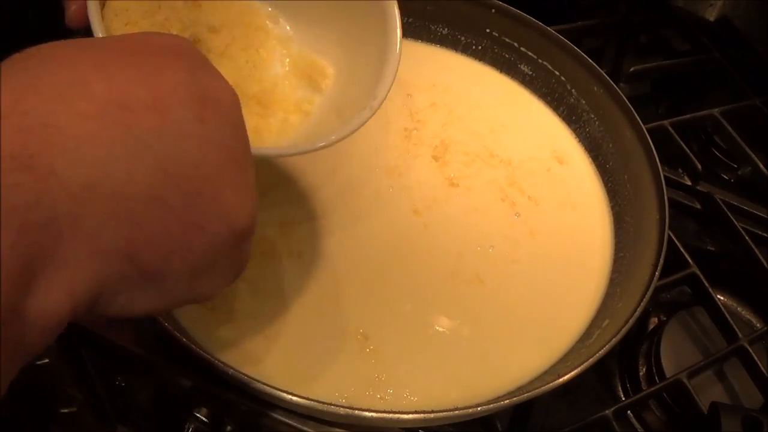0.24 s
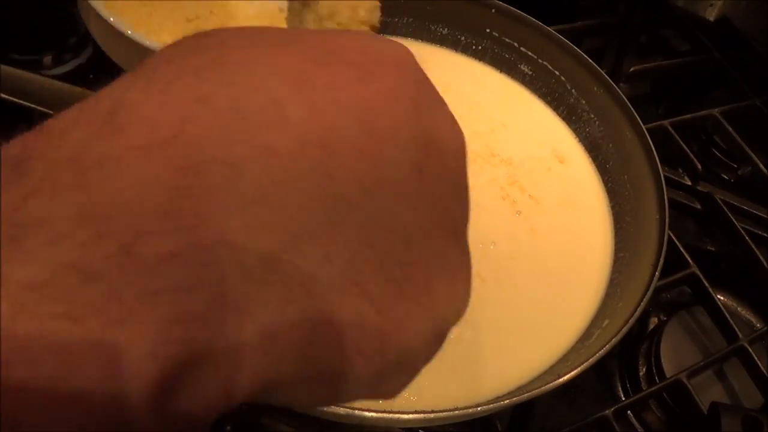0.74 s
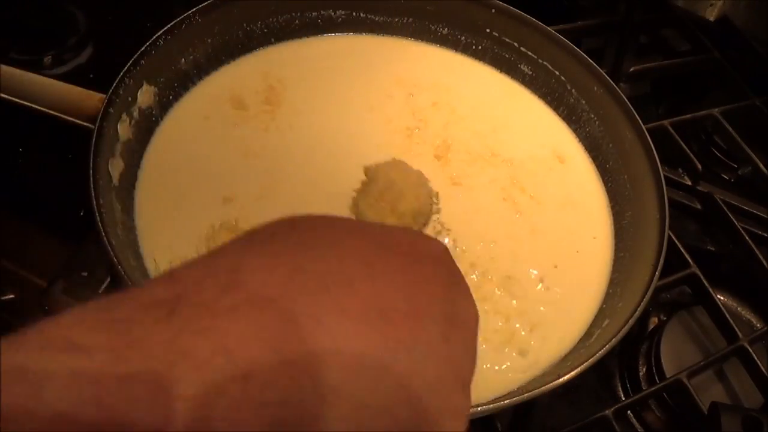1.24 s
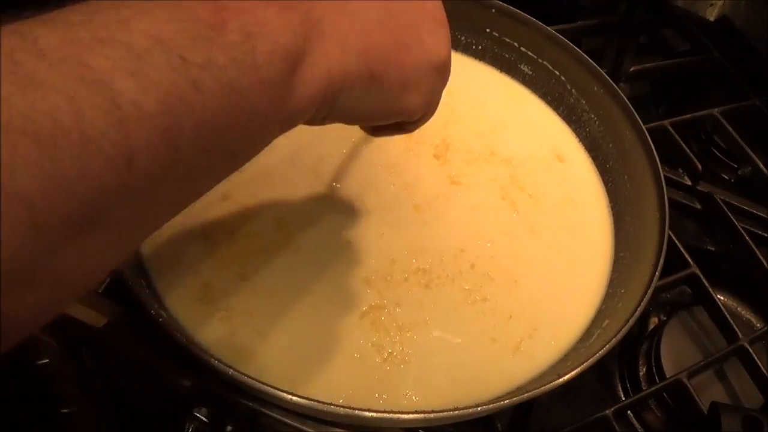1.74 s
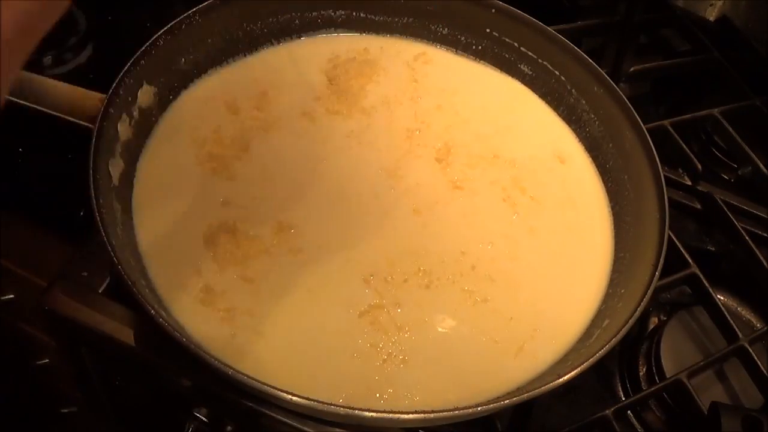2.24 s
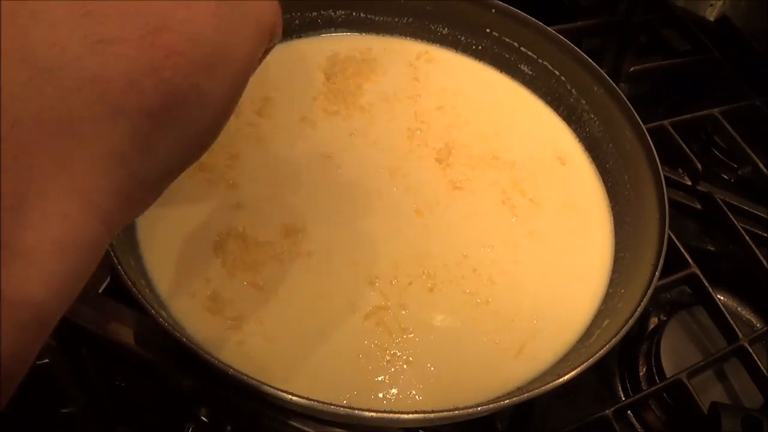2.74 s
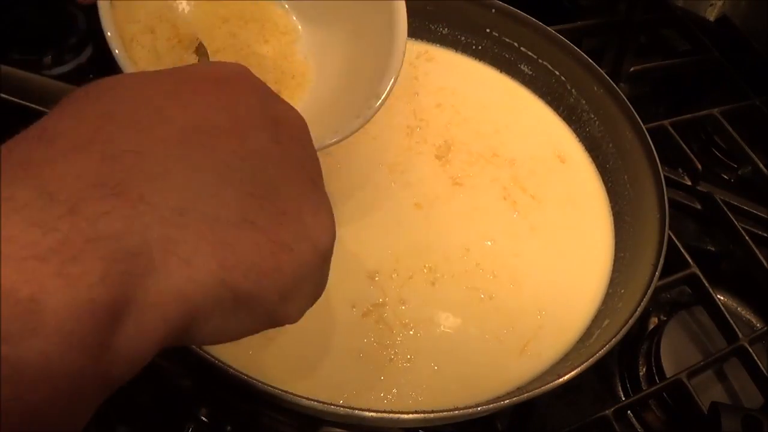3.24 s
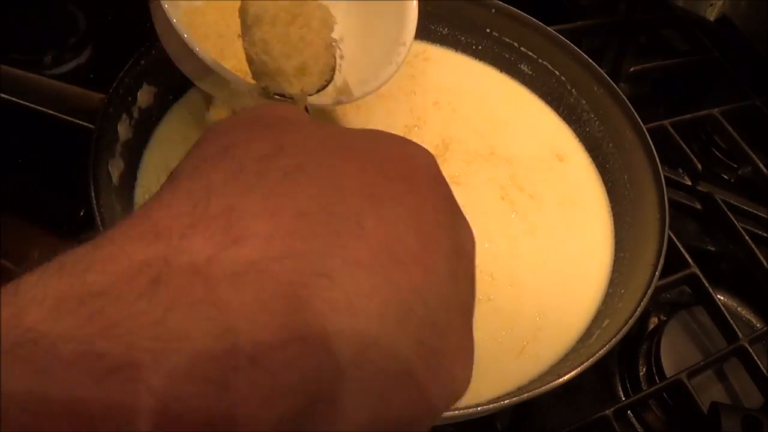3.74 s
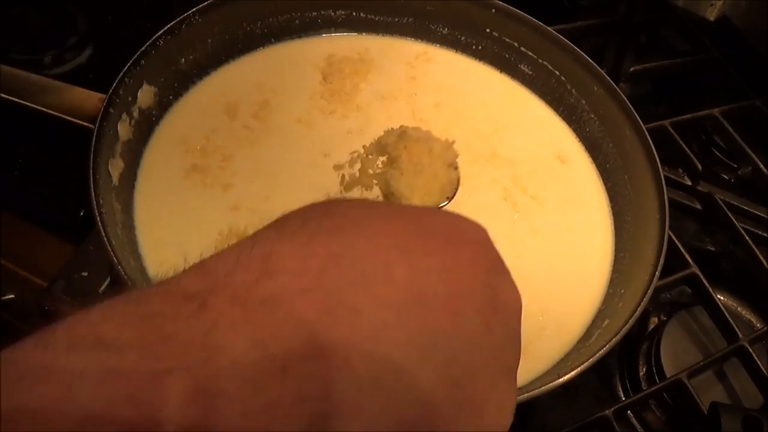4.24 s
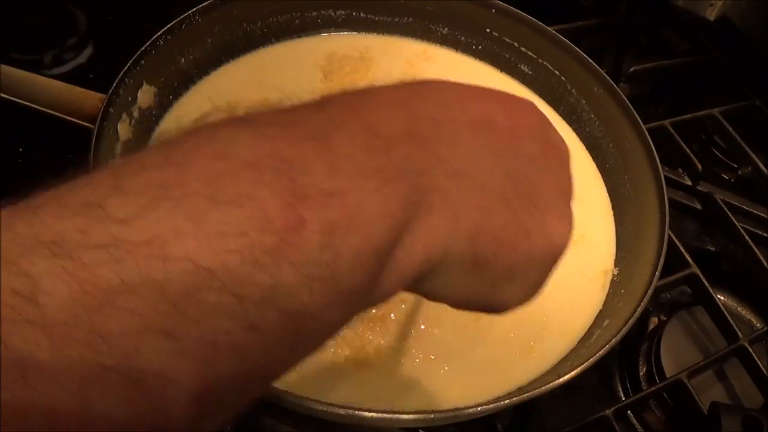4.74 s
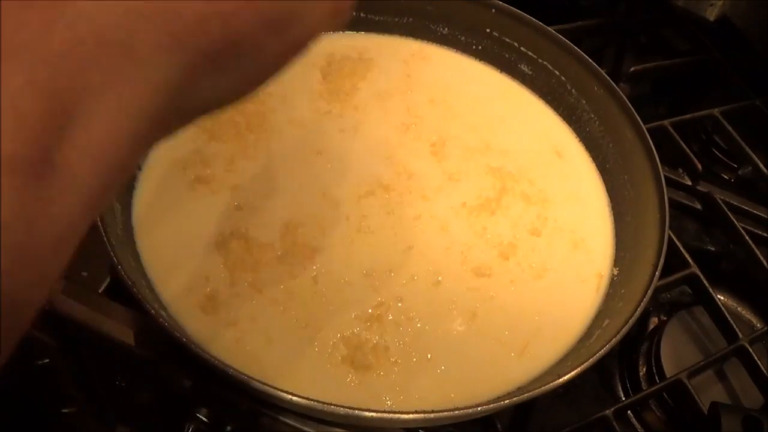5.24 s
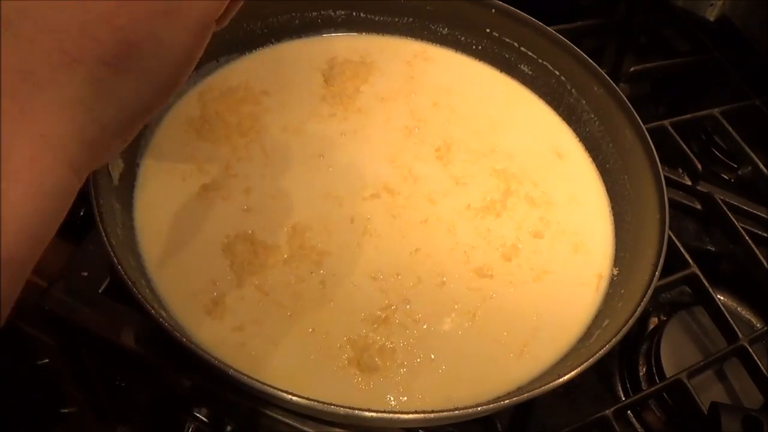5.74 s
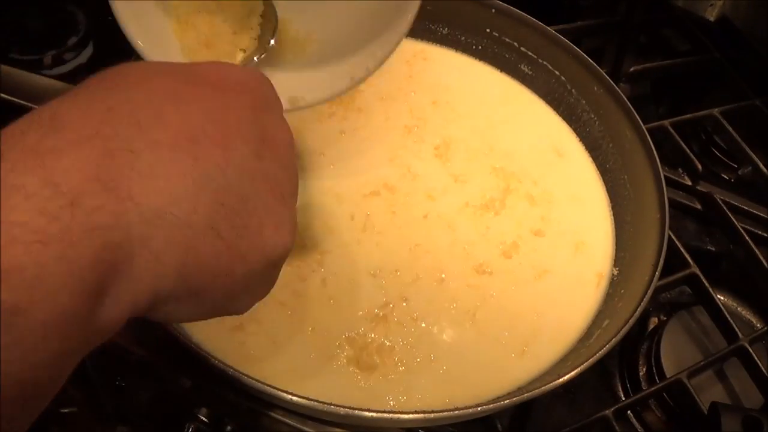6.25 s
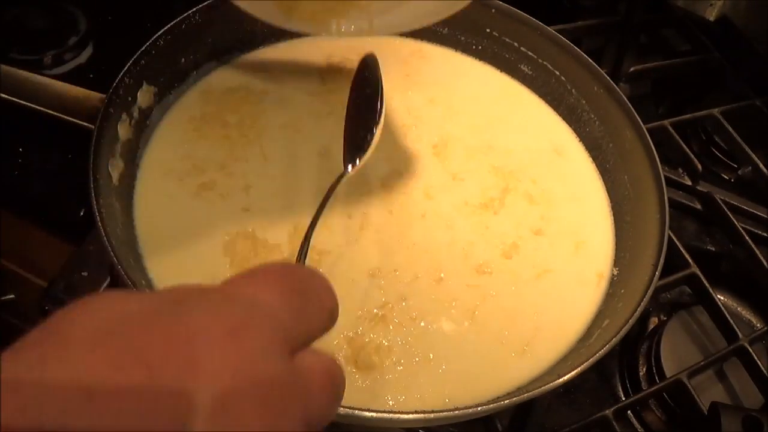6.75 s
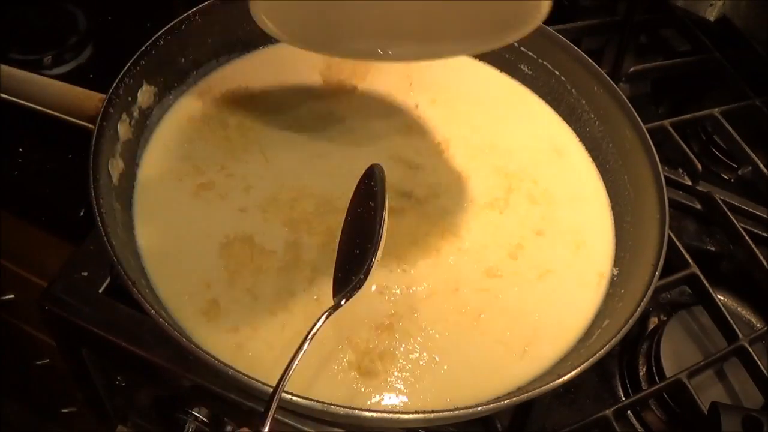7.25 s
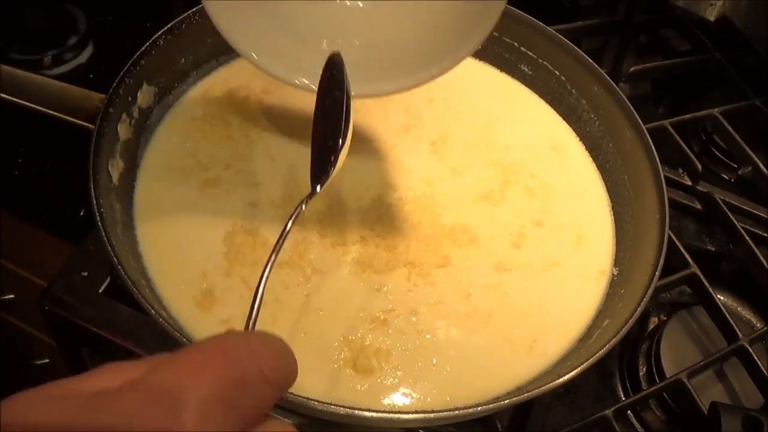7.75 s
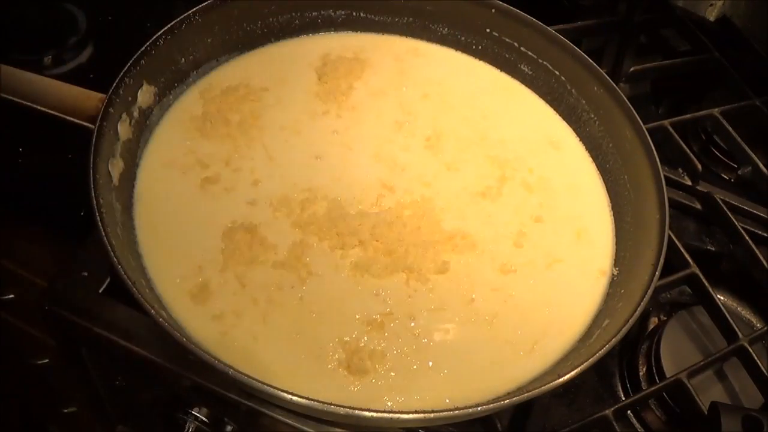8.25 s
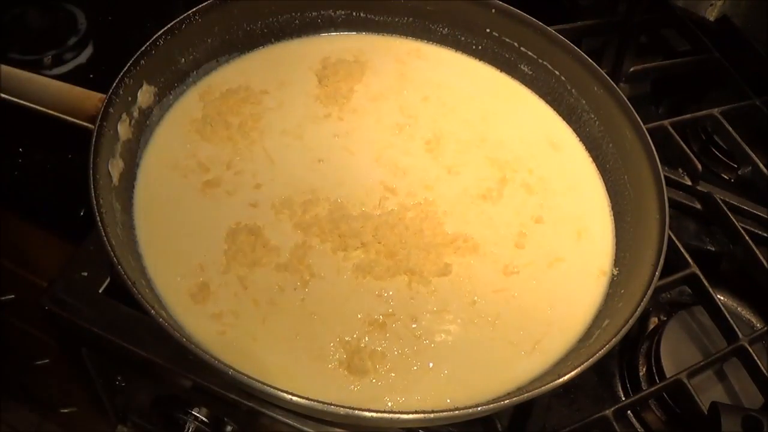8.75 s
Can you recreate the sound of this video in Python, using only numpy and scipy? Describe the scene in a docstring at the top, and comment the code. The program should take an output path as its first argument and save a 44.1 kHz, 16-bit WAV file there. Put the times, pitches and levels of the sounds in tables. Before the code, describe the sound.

A small kitchen, close microphone, with constant quiet hiss and faint fan hum. At once a steel spoon clinks and briefly scrapes in a hand-held ceramic bowl, with damped knocks until about 0.4 s and a very faint touch near 0.75. From 1.1 to 1.3 s grated cheese patters and rustles softly, then near quiet. At 2.5 s a sharp knock starts a second flurry, hardest at 2.9, with quick clinks and short scrapes fading by 3.8. Light grains and rustle follow around 3.9-4.5. At 5.5 s knocks return, brightest at 5.9, trailing into a scrape. From 6.1 to 7.6 come dull finger pats, soft rustle, tiny ticks and a barely audible rising squeak at 6.4. A loud, ringing ceramic clank bursts out at 8.2, another brighter spoon blow with a rasping scrape at 8.7, then small closing taps until 8.95.

```python
"""Small kitchen, close microphone: a steel spoon knocks and slides inside a hand-held ceramic bowl.
Under it all lies a quiet hum and hiss: noise shaped by a smooth spectrum with narrow bands. A first flurry of
knocks (cracks of noise and dying modes) ends by 0.8 s; from 1.1 s grated cheese patters into a pan as noise puffs.
Flurries return at 2.5 s and 5.5 s, with rustle and dull finger pats around them and a faint gliding squeak at 6.4 s.
From 8.2 s come loud last knocks; a look-ahead limiter flattens the hardest peaks."""
import sys
import numpy as np
from scipy import signal
from scipy.fft import rfft, irfft
from scipy.io import wavfile
from scipy.ndimage import uniform_filter1d, minimum_filter1d

SR = 44100
rng = np.random.default_rng(int(sys.argv[2]) if len(sys.argv) > 2 else 0)


def generate_wav(sig):
    """Save sig (samples, or channels by samples) to the path in sys.argv[1] as 16-bit PCM at SR."""
    pcm = np.round(np.clip(np.atleast_2d(sig).T, -1, 1) * 32767).astype(np.int16)
    wavfile.write(sys.argv[1], SR, pcm)


def field_ratio(decibels):
    """Amplitude ratio for a level in dB (20 dB per decade); scalars and array-likes work."""
    return 10 ** (np.asarray(decibels, dtype=float) / 20)


N = 396459  # samples, about 9 s

# modes of the ceramic bowl, which the hand splits in pairs: (frequency [Hz])
BOWL_MODE_HZ = [1290, 2130, 2268, 3210, 3320, 4110, 4185, 4355, 4530, 6850, 6945, 8343, 8625, 9570, 10450]
# how each bowl mode rings: (relative level [dB], t60 at full freedom [s], place of contact that rings it best [0-1])
BOWL_MODES = [(-25, 0.016, 0.2), (-2.5, 0.23, 0), (-5, 0.21, 1), (-15, 0.099, 0), (-23, 0.18, 1),
              (-0.5, 0.3, 0.79), (-8, 0.12, 0.63), (5.5, 0.13, 1), (-6, 0.14, 1), (-11, 0.31, 0),
              (-6.5, 0.37, 1), (-13, 0.34, 0), (-6, 0.13, 1), (-6.5, 0.21, 0), (-51, .1, 0)]
# modes of the steel spoon: (frequency [Hz])
SPOON_MODE_HZ = [820, 1800, 2535, 2880, 3215, 3855, 5495, 6280, 6377, 7320, 7757, 9720, 9860, 10625, 10980]
# how each spoon mode rings: (relative level [dB], t60 at full freedom [s], place of contact that rings it best [0-1])
SPOON_MODES = [(-29, 0.04, 0.4), (-15, 0.096, 0.4), (-3, 0.15, 0.87), (-25, 0.033, 0.81), (-29, 0.033, 1),
               (6.5, 0.1, 0.81), (-2.5, 0.06, 0.51), (-15, 0.31, 0.033), (-16.5, 0.29, 0.82),
               (-2.5, 0.16, 0.91), (-38, 0.58, .2), (-13, 0.15, 0.91), (-3.5, 0.23, 0.82), (-10, 0.13, 0.8),
               (2.5, 0.03, 0.99)]
EASE = 0.22  # share of a slide or squeak spent fading in and out


def evened(x):
    """Scales to an rms of 1."""
    return x / np.sqrt(np.mean(x ** 2) + 1e-20)


def read(points, hz):
    """Reads a spectrum on a log-frequency axis."""
    f, value = np.transpose(points)
    return np.interp(np.log(hz + 1), np.log(f + 1), value)


def add(mix, s, sound):
    """Mixes a sound in at s seconds."""
    part = mix[max(round(s * SR), 0):][:len(sound)]
    part += sound[:len(part)]


def band(x, lo_hz, hi_hz):
    """Band-pass."""
    return signal.sosfilt(signal.butter(2, [lo_hz, hi_hz], "bandpass", fs=SR, output="sos"), x, axis=-1)


def stroke(start, length, db, fall_db=0, ease=1):
    """Gain over time of one movement: eases in, loses fall_db on the way, eases out."""
    out, count = np.zeros(N), round(length * SR)
    fall = field_ratio(db - fall_db * np.linspace(0, 1, count))
    add(out, start, fall * signal.windows.tukey(count, ease))
    return out


def ring(hz, modes, db, hardness_db, place, free, sign):
    """Dying modes; a hard contact favours the high ones, the place favours those it lies near."""
    hz = np.array(hz)[:, None]
    mode_db, t60, best = np.transpose(modes)[:, :, None]
    t = np.arange(int(SR * np.clip(0.35 * free, 0.05, 0.33))) / SR
    level_db = db + mode_db + hardness_db * np.log2(hz / 4000) - 40 * (place - best) ** 2
    # a light touch swells more slowly
    swell = 1 - np.exp(-t / (0.00037 * field_ratio(-0.3 * min(db, 0))))
    # a pressed spoon makes the first few ms stand out from the ring
    pressed = np.clip(0.6 - free, 0, 1)
    swell = swell * (1 + 1.28 * pressed * np.exp(-(t / 0.0036) ** 2) / 0.57)
    # the shifting grip makes each mode waver: random values 12 ms apart, joined by straight lines
    steps = np.maximum(1 - abs(t / 0.012 - np.arange(32)[:, None]), 0)
    level, phase = rng.standard_normal((2, len(hz), 32)) @ steps
    fade = field_ratio(level_db + 1.5 * level - 60 * t / (free * t60))
    tones = np.sin(2 * np.pi * (hz * t + 0.24 * phase))
    return swell * (sign @ (fade * tones))


def air():
    """Room tone in stereo: smooth hiss with faint patches and the fuzzy bands of a far fan."""
    # hiss spectrum at the microphone: (frequency [Hz], relative level per Hz [dB])
    hiss_shape = [(12, -40), (20, -4.5), (145, -3), (228, -4.5), (890, -5), (1070, -6.5), (1780, -6.5),
                  (2090, -6), (3040, -10), (5200, -11), (7360, -16), (10700, -12), (11900, -27),
                  (15500, -74), (22000, -120)]
    # bands of the far fan: (centre [Hz], width [Hz], level [dB])
    fan_bands = [(240, 20, -75), (310, 25, -75), (716, 30, -77), (1093, 18, -71), (2180, 140, -71),
                 (5200, 120, -76)]
    # how alike the two channels are: (frequency [Hz], likeness [0-1])
    likeness = [(60, 0.9), (170, 0.96), (490, 0.44), (1400, 0.49), (4010, 0.43), (11400, 0.76)]
    hiss_db = -58  # level of the whole hiss
    frames, hz = N // 512 + 5, np.fft.rfftfreq(2048, 1 / SR)
    a, b, c, d, patches = rng.standard_normal((frames, 1025, 5)).T
    patches = evened(uniform_filter1d(uniform_filter1d(patches, 20, 0), 10, 1))
    hiss = field_ratio(read(hiss_shape, hz)) ** 2
    power = hiss / hiss.sum() * field_ratio(hiss_db) ** 2
    for f, width, db in fan_bands:
        bump = 1 / (1 + (2 * (hz - f) / width) ** 2)
        power = power + bump / bump.sum() * field_ratio(db) ** 2
    same = np.clip(read(likeness, hz), -1, 1)[:, None]
    left = a + 1j * b
    right = same * left + np.sqrt(1 - same ** 2) * (c + 1j * d)
    patch_gain = field_ratio(1.3 * patches * np.clip(hz / 400, 0, 1)[:, None])  # shallower below 400 Hz
    z = np.array([left, right]) * np.sqrt(power)[:, None] * patch_gain
    noise = signal.istft(z, nperseg=2048, noverlap=1536)[1][:, :N]
    return np.sqrt(power.sum()) * evened(noise)


def knocks():
    """A crack of a few ms, then bowl and spoon ring until hand and cheese damp them."""
    # spoon meets bowl: (time [s], bowl ring level [dB], spoon ring level [dB], place of contact [0-1],
    # freedom to ring [factor on the decay times])
    blows = [(0.001, -20, -26, 0.54, 0.19), (0.065, -21, -19.5, 0.37, 0.25),
             (0.226, -16.5, -18.5, 0.36, 0.36), (0.366, -30.5, -35, 0.38, 0.42),
             (0.753, -62, -52, 0.6, 0.42), (2.480, -20, -13.5, 0.58, 0.25), (2.543, -32.5, -40, 0.09, 0.38),
             (2.886, -10, -7.5, 0.35, 0.18), (2.907, -16, -19.5, 0.71, 0.92), (2.994, -15, -18, 0.4, 0.33),
             (3.038, -34, -46, 0.9, 0.15), (3.096, -20, -34, 0.44, 0.18), (3.180, -51, -56, 1, 0.47),
             (3.206, -62, -46, 1, 0.37), (3.256, -17, -19, 0.44, 0.16), (3.299, -47, -57, 0.5, 0.16),
             (3.314, -32, -56, 0.48, 0.17), (3.356, -40.5, -42.5, 0.51, 0.26),
             (3.484, -43, -63.5, 0.27, 0.35), (3.646, -21.5, -21, 0.41, 0.32),
             (3.708, -67, -47.5, 0.7, 0.23), (3.744, -76, -50, 0.56, 0.47), (3.775, -54, -46, 0.64, 0.23),
             (5.514, -16.5, -14, 0.01, 0.8), (5.573, -14.5, -20.5, 0.39, 0.32),
             (5.628, -37, -38, 0.57, 0.2), (5.882, -18, -8.5, 0.28, 1), (5.897, -6, -18.5, 1, 0.3),
             (5.935, -6, -17.5, 0.43, 0.4), (6.142, -33.5, -52, 0.12, 0.39),
             (6.195, -42.5, -56, 0.23, 0.57), (6.237, -43, -65, 0.23, 0.23), (6.364, -77, -54.5, 0.6, 0.41),
             (6.423, -45.5, -44, 0, 0.77), (6.706, -46.5, -44, 0, 0.54), (7.384, -43, -48, 0.2, .2),
             (8.241, -1, -13.5, 0.29, 0.56), (8.681, -9, -5, 0.24, 0.97), (8.800, -32, -28, 0.44, 0.68),
             (8.903, -38, -39, 0.55, 0.27), (8.945, -29, -29, 0.55, 0.65)]
    # colour of the crack before hardness tilts it: (frequency [Hz], relative level [dB])
    crack_colour = [(120, -44), (450, -23), (3480, -4), (4050, -1.5), (4890, -9.5), (5610, -11),
                    (6010, -15), (7250, -9.5), (8600, -16.5), (10600, -1.5), (11300, -4), (11900, -40),
                    (15500, -72), (22000, -120)]
    # edge-on blows ring the spoon more and are harder: a treble tilt in dB per octave
    even_hardness_db, hardness_per_db = -0.9, 0.43
    # light touches crack less, a pressed spoon cracks more
    crack_per_db, crack_lift_db, pressed_crack_db = 1.37, 7, 11
    out, t, hz = np.zeros(N), np.arange(1024) / SR, np.fft.rfftfreq(1024, 1 / SR)
    noise = rng.standard_normal((len(blows), 1024))
    signs = rng.choice([-1., 1.], (len(blows), 30))
    for (s, bowl_db, spoon_db, place, free), z, sign in zip(blows, noise, signs):
        hard_db = even_hardness_db + hardness_per_db * (spoon_db - bowl_db)
        colour = field_ratio(read(crack_colour, hz) + 0.5 * hard_db * np.log2((hz + 50) / 4000))
        fade = np.exp(-t / (0.016 * np.clip(free, 0.15, 0.7))) * (1 - np.exp(-t / 0.00031))
        crack = evened(irfft(rfft(z) * colour)) * fade
        crack_db = crack_per_db * spoon_db + crack_lift_db + pressed_crack_db * (0.5 - free)
        add(out, s, field_ratio(crack_db) * crack)
        add(out, s, ring(BOWL_MODE_HZ, BOWL_MODES, bowl_db, hard_db, place, free, sign[:len(BOWL_MODES)]))
        add(out, s, ring(SPOON_MODE_HZ, SPOON_MODES, spoon_db, hard_db, place, free, sign[-len(SPOON_MODES):]))
    return out


def kitchen(x):
    """Three tails of sparse taps fed in turn, each band dying at its own speed; left and right partly alike."""
    # how long the small room rings: (frequency [Hz], t60 [s])
    room_decay = [(300, 0.38), (1000, 0.47), (3000, 0.34), (8000, 0.26)]
    taps = np.zeros((3, 2, SR // 2))
    # one tap at random within every 20 samples
    at = np.arange(100, SR // 2 - 20, 20) + rng.integers(0, 20, (3, 2, (SR // 2 - 101) // 20))
    np.put_along_axis(taps, at, rng.choice([-1., 1.], at.shape), 2)
    taps = taps + 0.31 * taps[:, ::-1]
    hz, t, z = signal.stft(taps, SR, nperseg=256)
    decay = field_ratio(-60 * t / read(room_decay, hz)[:, None])
    tails = signal.istft(z * decay, SR, nperseg=256)[1]
    # the three feeds swing at 7 Hz, a third of a cycle apart
    cycles = 7 * np.arange(N) / SR + np.arange(3)[:, None] / 3
    feeds = x * np.cos(2 * np.pi * cycles) * np.sqrt(2 / 3)
    tails = tails / np.linalg.norm(tails[0, 0])
    return signal.fftconvolve(feeds[:, None], tails, axes=2).sum(0)[:, :N]


def slides():
    """Tiny uneven catches of steel on glaze keep both bodies singing."""
    # the spoon slides on the glaze: (start [s], length [s], rasp level [dB], loss by the end [dB],
    # lift of the tip hiss and equal cut of the bowl hum [dB])
    glides = [(0.005, 0.066, -40, 15, -10), (0.735, 0.02, -68, 10, 26), (0.59, 0.26, -75.5, 1, 25),
              (2.684, 0.1, -59, 5, 10.5), (3.01, 0.11, -44, 18, -10), (3.107, 0.15, -45, 16, 3),
              (3.76, 0.15, -53, 4, 11), (5.962, 0.21, -37.5, 18, -7), (6.16, 0.55, -73, 0, -21),
              (6.357, 0.14, -63, 5, 14), (6.686, 0.18, -65, 12, -19), (8.692, 0.14, -19.5, 28, 8),
              (8.819, 0.18, -47.5, 0.5, -12.5)]
    singing_db = -9.5  # tip hiss and bowl hum against the rasp, before lift and cut
    catches = rng.laplace(size=(3, N)) * (rng.random((3, N)) < 450 / SR)  # about 450 a second
    signs = np.ones(len(BOWL_MODES))
    tip_body = ring(SPOON_MODE_HZ, SPOON_MODES, 0, 17.3, 0.29, 0.36, signs)
    bowl_body = ring(BOWL_MODE_HZ, BOWL_MODES, 0, -33.0, 0.15, 0.58, signs)
    both = [(SPOON_MODE_HZ, SPOON_MODES), (BOWL_MODE_HZ, BOWL_MODES)]
    rasp_body = sum(ring(hz, modes, 0, 0.1, 0.7, 0.17, signs)[:SR // 20] for hz, modes in both)
    bodies = [tip_body, bowl_body, rasp_body]
    tip, hum, rasp = [evened(signal.oaconvolve(c, body)[:N]) for c, body in zip(catches, bodies)]
    out = np.zeros(N)
    for s, length, db, fall_db, tip_db in glides:
        singing = field_ratio(singing_db + tip_db) * tip + field_ratio(singing_db - tip_db) * hum
        out += stroke(s, length, db, fall_db, EASE) * (rasp + singing)
    return out


def thuds():
    """The hardest blows jolt the bowl in the hand: a dull puff as palm and cheese take up the blow."""
    # jolts: (time [s], level before the fade [dB], centre [Hz])
    jolts = [(0.065, -37.5, 1700), (0.226, -37.5, 810), (2.481, -30, 1390), (2.542, -38.5, 820),
             (2.888, -20, 1450), (2.907, -22, 810), (2.994, -29, 1080), (3.255, -39, 1680),
             (3.647, -26, 1670), (5.514, -29, 770), (5.573, -26.5, 750), (5.882, -19, 1310),
             (5.897, -33, 820), (5.935, -33, 900), (8.241, -16, 740), (8.681, -23.5, 746)]
    span = 1.9  # band edges as a factor on the centre
    out, t = np.zeros(N), np.arange(4000) / SR
    fade = np.exp(-t / 0.013) * (1 - np.exp(-t / 0.0016))
    for (s, db, hz), z in zip(jolts, rng.standard_normal((len(jolts), 4000))):
        puff = evened(band(z, hz / span, hz * span))
        add(out, s, field_ratio(db) * puff * fade)
    return out


def grains():
    """Cheese lands in the pan: each grain is a puff of noise with no ring."""
    # placed grains: (time [s], level before a 16 dB cut [dB], centre [Hz])
    placed = [(1.159, -22, 9800), (1.174, -38, 5140), (1.188, -34, 1670), (1.204, -21.5, 4250),
              (1.227, -34, 1530), (1.662, -29, 10300), (3.877, -33, 9600), (3.917, -24, 5500),
              (4.004, -30, 9680), (4.079, -29, 9570), (4.093, -19, 10100), (4.19, -33.5, 5430),
              (4.368, -32.5, 2310), (4.49, -30.5, 6050), (4.982, -33, 6000), (7.231, -28, 9600)]
    # faint stray grains fall at random; levels take the same 16 dB cut
    strays_per_s, stray_db, stray_spread_db = 2.9, -38, -0.5
    out, t = np.zeros(N), np.arange(800) / SR
    gap, size, pitch = rng.random((40, 3)).T
    stray_s = np.cumsum(-np.log(gap + 1e-9) / strays_per_s)
    strays = zip(stray_s, stray_db - stray_spread_db * np.log(size + 0.05), 1500 * 6 ** pitch)
    for (s, db, hz), z in zip(placed + list(strays), rng.standard_normal((len(placed) + 40, 800))):
        puff = evened(band(z, hz * 0.56, min(hz * 7.6, 15000)))
        add(out, s, field_ratio(db - 16.0) * puff * np.exp(-t / 0.0033))
    return out


def pats():
    """Fingers pat the outside of the bowl: each pat is a few dull cycles."""
    # pats: (time [s], level before the swell [dB], pitch [Hz])
    touches = [(0.703, -49, 797), (3.827, -46, 1405), (6.14, -41.5, 675), (6.18, -39, 680),
               (6.389, -47.5, 676), (6.423, -45, 355), (6.456, -44.5, 814), (6.479, -47, 770),
               (6.559, -44.5, 400), (6.707, -45, 1280), (6.732, -45, 1270), (7.435, -51, 1330),
               (7.585, -46, 282)]
    out, t = np.zeros(N), np.arange(1500) / SR
    swell = t / 0.0031 * np.exp(1 - t / 0.0025)
    for s, db, hz in touches:
        add(out, s, field_ratio(db) * swell * np.sin(2 * np.pi * hz * t))
    return out


def rustle():
    """Soft rustle of hands and loose cheese: clumped noise, a dull and a bright part, swelling and fading."""
    # movements: (start [s], length [s], dull level [dB], bright level [dB])
    moves = [(1.11, 0.18, -59.5, -52.5), (3.87, 0.32, -62, -58.5), (6.276, 0.64, -57, -62.5),
             (6.894, 0.88, -60.5, -72), (8.102, 0.089, -62, -48), (7.95, 0.25, -69, -63),
             (8.396, 0.29, -59.5, -64), (8.8, 0.22, -54.5, -54)]
    z = rng.standard_normal((4, N))
    clumps = field_ratio(3.4 * np.array([evened(uniform_filter1d(v, 400)) for v in z[2:]]))
    dull = evened(band(z[0], 100, 810) * clumps[0])
    bright = evened(band(z[1], 1200, 5400) * clumps[1])
    return sum(stroke(s, length, 0) * (field_ratio(dull_db) * dull + field_ratio(bright_db) * bright)
               for s, length, dull_db, bright_db in moves)


def squeak():
    """A faint fuzzy tone that glides up: slow noise carried on a moving pitch."""
    # the glide: (start [s], length [s], level [dB], first pitch [Hz], last pitch [Hz])
    glide = (6.44, 0.3, -66, 4200, 4420)
    s, length, db, first_hz, last_hz = glide
    pitch = np.interp(np.arange(N) / SR, [s, s + length], [first_hz, last_hz])
    carrier = np.exp(2j * np.pi * np.cumsum(pitch) / SR)
    fuzz = uniform_filter1d(rng.standard_normal((2, N)), size=160)
    tone = evened((carrier * (fuzz[0] + 1j * fuzz[1])).real)
    return stroke(s, length, db, ease=EASE) * tone


def scene():
    """Near sounds, their echo in the kitchen, and the room tone; such small things send out no bass."""
    near = knocks() + slides() + thuds() + grains() + pats() + rustle() + squeak()
    near = signal.sosfilt(signal.butter(3, 210, "highpass", fs=SR, output="sos"), near)
    return near + field_ratio(-8.0) * kitchen(near) + air()


def roll_off(x):
    """The treble ends steeply here."""
    return signal.sosfilt(signal.butter(12, 12050, fs=SR, output="sos"), x)


def record(dry):
    """The limiter sees a peak coming, ducks just before it and lets go at a steady pace; then a band limit."""
    peak_db = 20 * np.log10(abs(dry).max(0) + 1e-9)
    fall = np.arange(N) * 3800.0 / SR  # lets go at this many dB a second
    held_db = np.maximum.accumulate(peak_db + fall) - fall
    over_db = np.maximum(held_db + 9.0, 0)  # threshold at -9 dB
    ahead_db = -minimum_filter1d(-over_db, size=177, origin=-88)  # 4 ms of look-ahead
    duck_db = 0.8 * uniform_filter1d(ahead_db, size=88, origin=43)  # takes off 80 % of the excess
    limited = dry / field_ratio(duck_db)
    edge = signal.firwin(1201, 11090, window=("kaiser", 7), fs=SR)  # low-pass at 11.09 kHz
    mix = signal.oaconvolve(limited, edge[None], "same")
    return roll_off(mix)


dry = scene()
out = record(dry)
generate_wav(out)
```